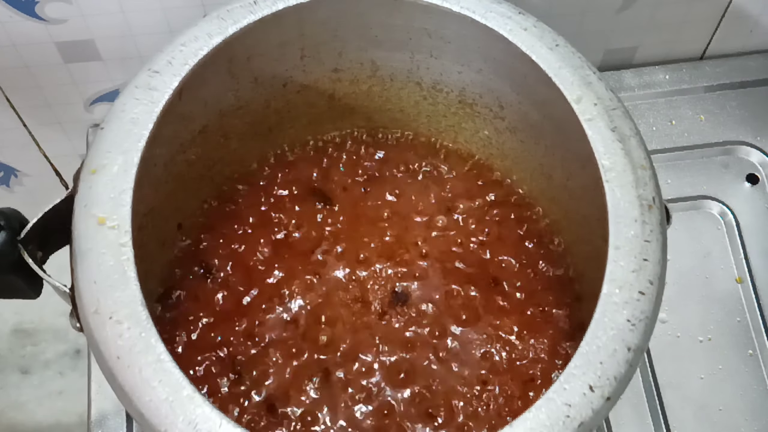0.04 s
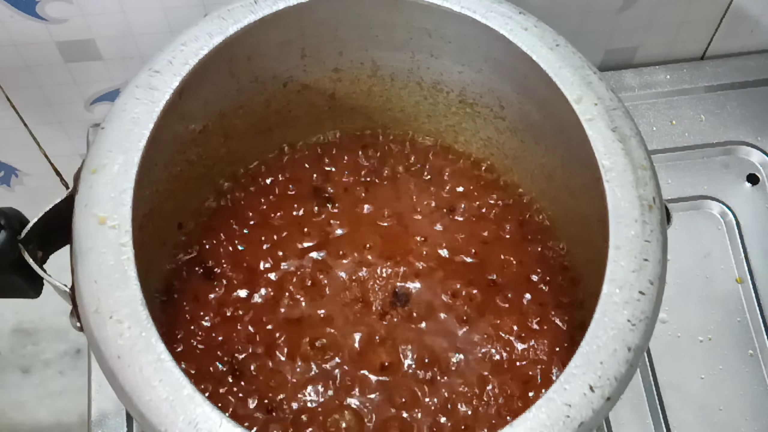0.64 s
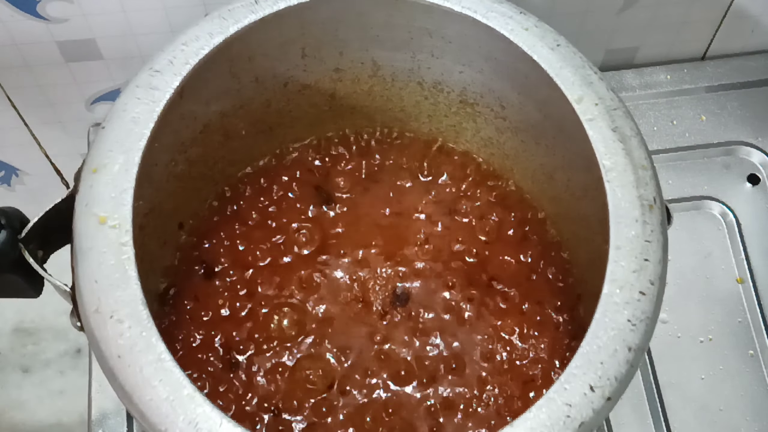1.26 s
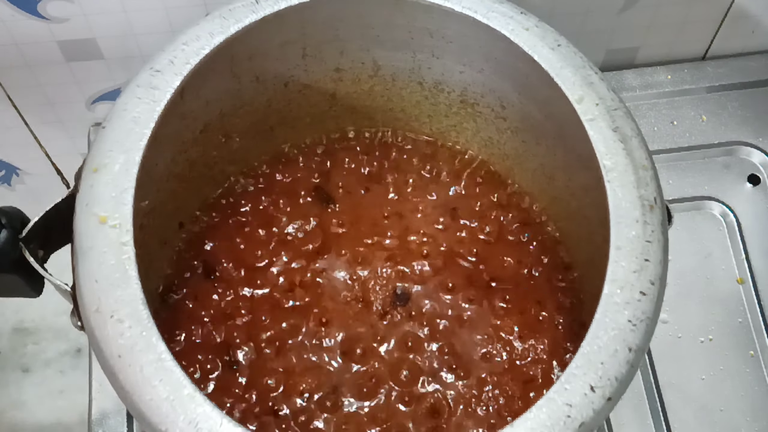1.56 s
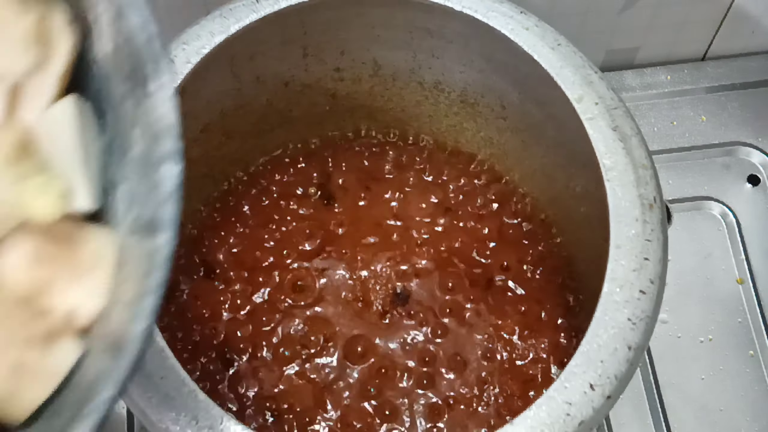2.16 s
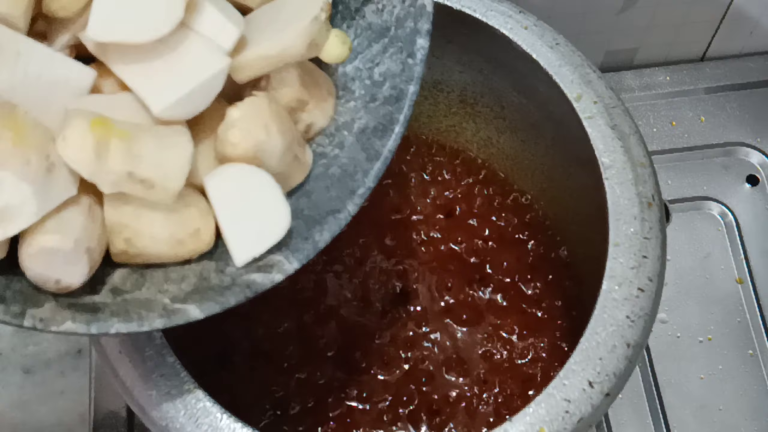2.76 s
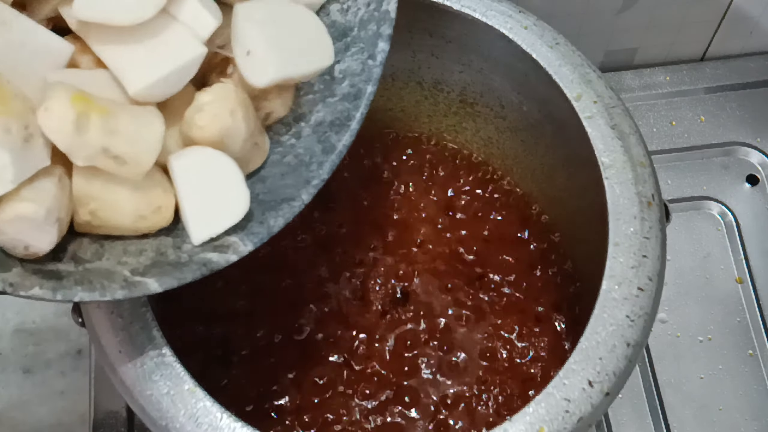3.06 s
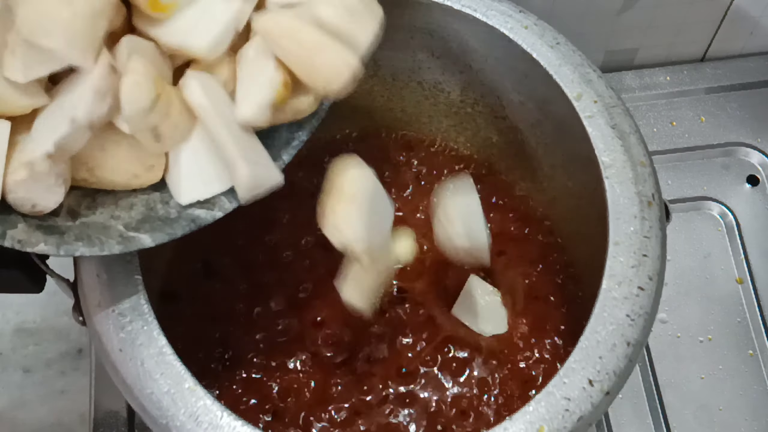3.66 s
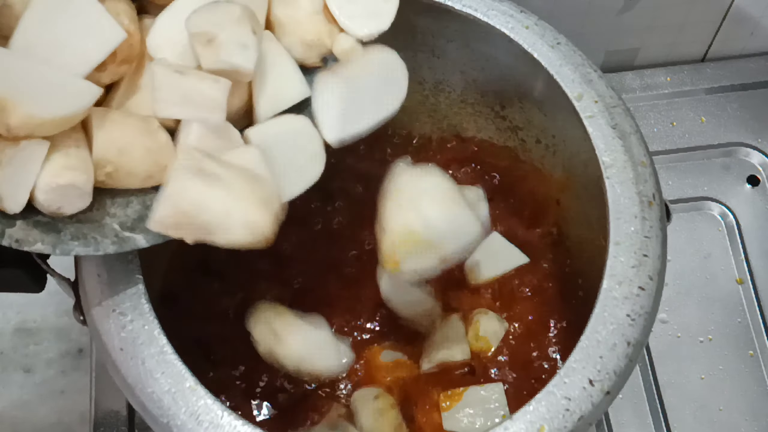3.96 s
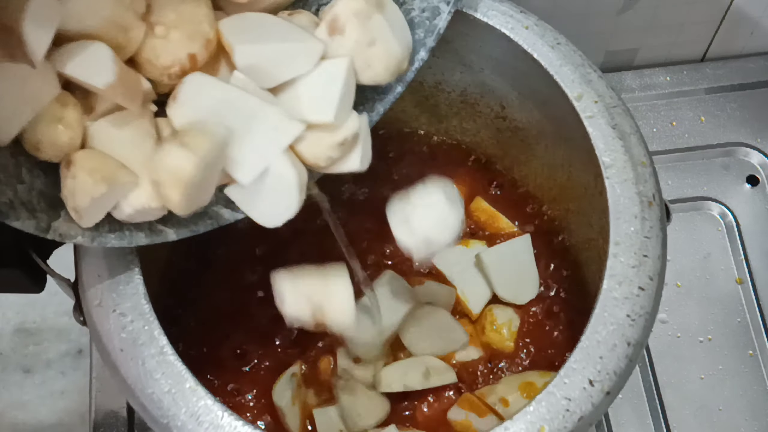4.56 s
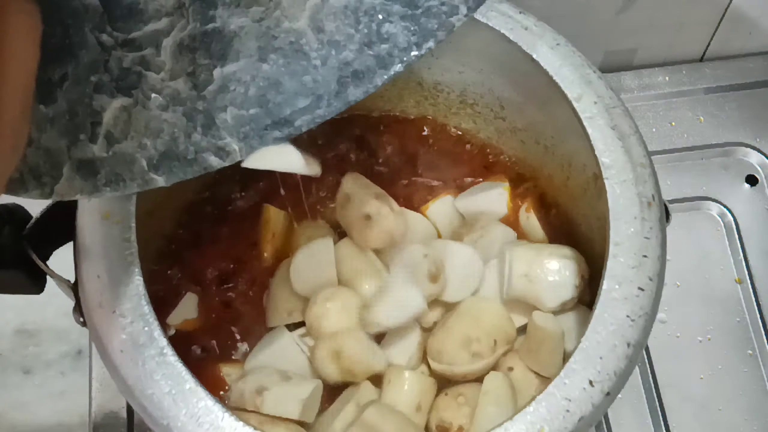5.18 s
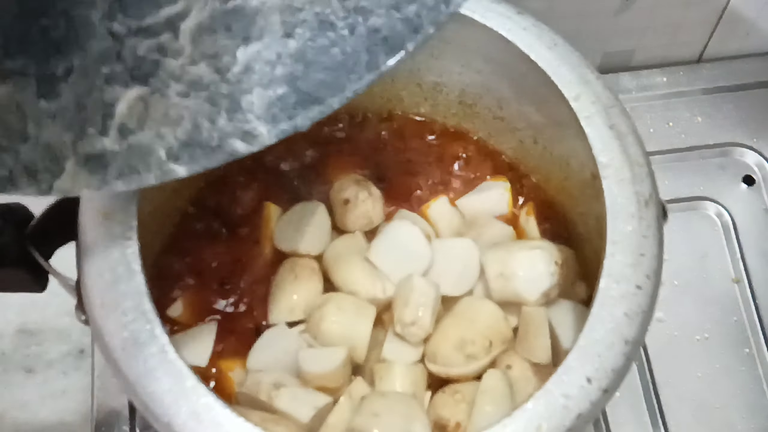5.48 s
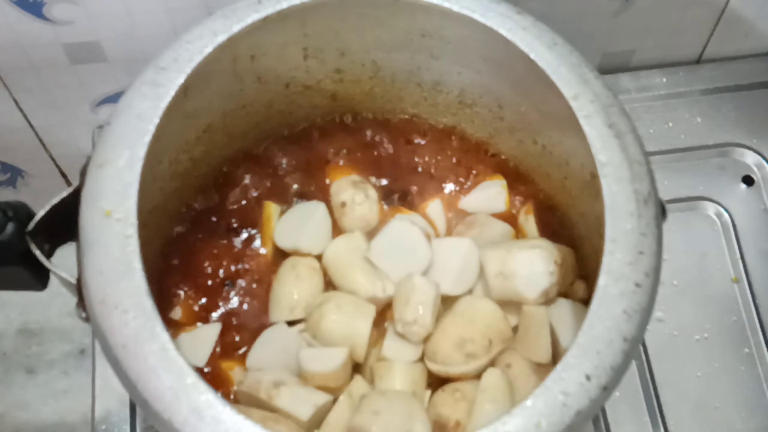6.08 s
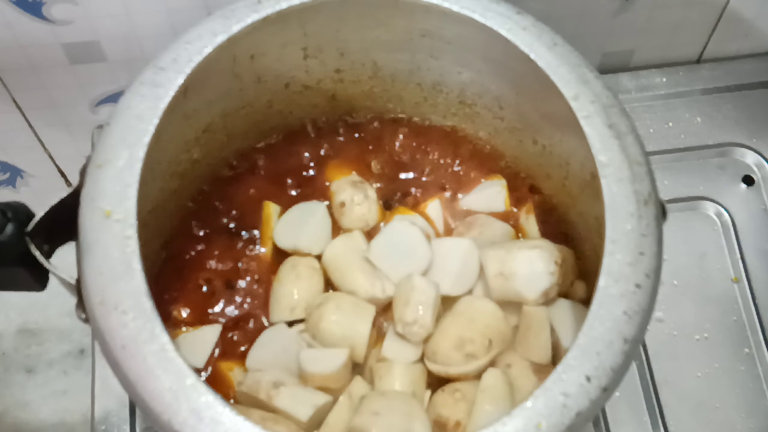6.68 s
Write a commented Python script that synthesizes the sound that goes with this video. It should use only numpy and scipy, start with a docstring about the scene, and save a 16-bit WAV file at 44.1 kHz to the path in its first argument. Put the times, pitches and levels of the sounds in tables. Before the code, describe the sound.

Thick sauce simmers quietly in an open metal cooker, with fine crackling and small bubble pops. About halfway through, vegetable chunks plop in one by one with a couple of sharp hissing splashes, then tumble in as a thudding, squelching heap. The sizzle grows, with tiny squeaks of steam. At the end a plate lands on a steel counter with a ringing double knock. It is heard close up in a small kitchen.

```python
"""Thick masala simmers in an open aluminium cooker in a small tiled kitchen: tiny bubbles crackle and fat
ones make the air in the pot ring. A plate of vegetable chunks is picked up and swung over the pot.
From 3.7 s the chunks plop into the sauce, singly and then in a heap; sauce splashes on the hot metal,
steam squeaks and sputters out, and the sizzle grows. At 6.5 s the plate is set down on the steel
counter with a ringing double knock."""
import sys
import numpy as np
from scipy import signal
from scipy.fft import rfft, irfft, next_fast_len
from scipy.io import wavfile
from scipy.ndimage import uniform_filter1d, map_coordinates

SR = 44100
rng = np.random.default_rng(int(sys.argv[2]) if len(sys.argv) > 2 else 0)


def unload_wav(signal):
    """Save mono or channel-first audio to the path in sys.argv[1] as 16-bit WAV at rate SR, clipped to [-1, 1]."""
    wavfile.write(
        sys.argv[1],
        SR,
        np.round(np.clip(np.atleast_2d(signal).T, -1, 1) * 32767).astype(np.int16),
    )


N = 301229
TIME = np.arange(N) / SR  # seconds into the scene
AGE = np.arange(SR // 2) / SR  # seconds into one short event
LEFT_DELAY_SAMPLES = 36  # sound reaches the left microphone later


def amp(db):
    """Turn decibels into a gain."""
    return 10 ** (np.asarray(db) / 20)

def unit(x):
    """Scale to an average (rms) size of 1."""
    return x / np.sqrt(np.mean(x ** 2) + 1e-20)

def peaked(x):
    """Scale to a peak of 1."""
    return x / np.abs(x).max()

def along(points, hz):
    """Read between (f/Hz, value) points on a log frequency axis."""
    f, v = np.transpose(points)
    return np.interp(np.log(hz + 1), np.log(f + 1), v)

def wobble(rate):
    """A smooth curve through `rate` random values a second."""
    return map_coordinates(rng.standard_normal(400), [TIME * rate], order=3, mode="wrap")

def unsteady():
    """A quick random waver, as long as one event."""
    return unit(uniform_filter1d(uniform_filter1d(rng.standard_normal(len(AGE)), size=200), size=200))

def dying(t60):
    """A fade that falls 60 dB in t60 seconds."""
    return np.exp(-np.log(1000) * AGE / max(t60, 1e-3))

def swell(s, attack_s, hold_s, release_s, t=TIME):
    """A gain that rises from s seconds, holds at 1, then falls 60 dB in release_s."""
    rise = np.clip((t - s) / max(attack_s, 1e-3), 0, 1)
    fading_s = np.maximum(t - s - attack_s - hold_s, 0)
    return rise * np.exp(-np.log(1000) * fading_s / max(release_s, 1e-3))

def filtered(x, response):
    """Filter x; response(hz) gives the gain and phase at each frequency."""
    n = x.shape[-1]
    padded = 2 * next_fast_len(n // 2 + 4096)
    return irfft(rfft(x, padded) * response(np.fft.rfftfreq(padded, 1 / SR)), padded)[..., :n]

def coloured(x, points):
    """Shape the tone of x with (f/Hz, level/dB) points."""
    def response(hz):
        cepstrum = irfft(np.log(amp(along(points, hz))))
        # folded so that nothing sounds before its cause
        cepstrum[1:len(hz) - 1] *= 2
        cepstrum[len(hz):] = 0
        return np.exp(rfft(cepstrum))
    return filtered(x, response)

def resonant(x, notes):
    """Let x ring at some notes: (f/Hz, rough width/Hz, level/dB)."""
    def response(f):
        return sum(amp(db) * (1j * f * 1.62 * width / (hz * hz - f * f + 1j * f * 1.38 * width)) ** 2
                   for hz, width, db in notes)
    return filtered(x, response)

def space(x, echo_db, t60):
    """Direct sound at two microphones plus echoes from pot wall and tiles."""
    paths = rng.standard_normal((2, len(AGE))) * dying(t60) * (1 - np.exp(-AGE / 0.0032))
    paths *= amp(echo_db) / np.linalg.norm(paths[0])
    paths[0, LEFT_DELAY_SAMPLES] += 1
    paths[1, 0] += 1
    return signal.fftconvolve(x[None], paths, axes=1)[:, :len(x)]

def scattered(source, echo_db, t60, count=2):
    """A source heard from several spots in the pot, each with its own echoes."""
    return unit(sum(space(source(), echo_db, t60) for _ in range(count)))

def add(track, s, sound):
    """Mix a stereo sound in at s seconds."""
    part = track[:, round(s * SR):][:, :sound.shape[1]]
    part += sound[:, :part.shape[1]]

def burst(t60):
    """A puff of noise that dies away."""
    return rng.standard_normal(len(AGE)) * dying(t60)

def pops(rate, spread_db):
    """Random clicks, `rate` a second, scattered in size by spread_db."""
    size = amp(spread_db * np.clip(rng.standard_normal(N), -2.5, 2.5))
    return (rng.random(N) < rate / SR) * size * rng.choice([-1, 1], N)

def whistle(hz, waver, glide_per_s, attack_s, hold_s, release_s):
    """A short tone that swells and fades; its pitch glides and wavers by a share of itself."""
    pitch = hz * (1 + waver * unsteady() + glide_per_s * (AGE - attack_s))
    return swell(0, attack_s, hold_s, release_s, AGE) * np.sin(2 * np.pi * np.cumsum(pitch) / SR)


# tone of the background: f/Hz, level/dB
ROOM_COLOUR = [(25, -4), (60, -3), (100, 6), (140, -14), (190, 2), (260, -8), (600, -2.5), (1500, -20),
               (8000, -8), (10500, -3.5), (13500, -15.5), (15200, -4.5)]

def room_tone():
    """The faint rumble of the burner and the kitchen."""
    noise = space(rng.standard_normal(N), echo_db=3.5, t60=0.17)
    return amp(-56.5) * unit(coloured(noise, ROOM_COLOUR))

# deep notes of the air in the pot: f/Hz, width/Hz, level/dB
DEEP_AIR = [(355.4, 6.2, 4), (396, 53, -1), (640, 170, -23)]
# runs of gurgling: t/s, level/dB
GURGLES = [(0.55, -56), (0.75, -60), (2.44, -58), (2.69, -54)]

def gurgles():
    """Slow bubbles sound the whole depth of the pot, faintly all the time and now and then in a run."""
    runs = sum(amp(db) * swell(s, attack_s=0.028, hold_s=0.014, release_s=0.16) for s, db in GURGLES)
    bubbles = space(pops(rate=110, spread_db=0), echo_db=-22.5, t60=0.45)
    return (amp(-67) + runs) * unit(resonant(bubbles, DEEP_AIR))

# notes of the air across the pot, then its higher ones: f/Hz, width/Hz, level/dB
POT_AIR = [(1214, 38.5, -5), (1293, 92, -11.5), (1546, 240, -14.5)]
HIGH_AIR = [(1910, 69, 2), (3630, 52, -12)]

def fat_bubbles():
    """Fat bubbles burst in fits and ring the air in the pot; the heap muffles all but the lowest note."""
    bursts = scattered(lambda: pops(rate=140, spread_db=1), echo_db=2.5, t60=0.059)
    full, stirred = fullness(), amp(-65) * stirring()
    fits = lambda db: amp(db) * unit(amp(0.5 * wobble(20)))
    bare = (fits(-63) + stirred) * unit(resonant(bursts, POT_AIR))
    high = (fits(-61.5) + amp(11) * stirred) * unit(resonant(bursts, HIGH_AIR))
    filled = (fits(-63) + stirred) * unit(resonant(bursts, POT_AIR[:1]))
    return (1 - full) * (bare + high) + full * filled

# big bubbles: t/s, level/dB, f/Hz
BIG_BUBBLES = [(0.04, -62, 1240), (0.27, -57, 1200), (0.35, -55, 1895), (0.401, -57, 1223),
               (0.609, -51.5, 1206), (0.73, -51, 1937), (0.899, -47, 1924), (1.16, -51, 1904),
               (1.19, -56.5, 1233), (1.229, -48, 1896), (1.421, -54, 1195), (1.49, -55, 1215),
               (1.7, -48, 1916), (1.96, -59, 1927), (2.049, -56, 1215), (2.269, -58, 1230),
               (2.361, -55, 1920), (2.51, -56, 1179), (2.711, -52, 1201), (2.839, -52.5, 1186),
               (3.029, -56, 1202), (3.192, -54.5, 1204), (3.239, -49, 1905), (3.56, -48, 1894),
               (3.66, -49, 1933), (3.67, -52.5, 1183), (4.381, -49.5, 1204), (4.461, -52.5, 1194),
               (4.66, -49, 1215), (4.829, -48, 1160), (4.899, -42, 1187), (5.43, -47.5, 1193),
               (5.921, -51, 1192), (6.259, -46.5, 1180), (6.37, -49, 1194), (6.43, -48, 1175)]

def big_bubbles():
    """A big bubble wells up and rings one note of the pot's air, each at a slightly different pitch."""
    out = np.zeros((2, N))
    for s, db, hz in BIG_BUBBLES:
        glide = 0.5 * rng.uniform(-1, 1)
        tone = whistle(hz, waver=0.017, glide_per_s=glide, attack_s=0.023, hold_s=0.01, release_s=0.19)
        add(out, s, amp(db) * space(tone, echo_db=-8, t60=0.1))
    return out

# single bubbles that spit: t/s, relative level/dB, f/Hz
SPITS = [(0.454, -44, 6440), (0.635, -43.5, 6100), (1.3272, -50, 1575), (1.4388, -40.5, 3850),
         (1.5686, -43.5, 3860), (1.925, -42, 6030), (3.364, -44.5, 4750)]

def spits():
    """A larger bubble bursts with a short pitched spit."""
    out = np.zeros((2, N))
    for s, db, hz in SPITS:
        spit = resonant(burst(t60=0.02), [(hz, hz / 9, 0), (hz * 1.16, hz / 1.9, -13)])
        add(out, s, amp(db + 5.5) * space(peaked(spit), echo_db=4.5, t60=0.24))
    return out

def pings(rate, hz, spread, cycles, size_db):
    """Small bubbles each ring briefly at their own pitch; a few are much louder than the rest."""
    start, pitch, size = rng.random((int(rate * N / SR), 3)).T[:, :, None]
    f = np.minimum(hz * np.exp(spread * (2 * pitch - 1)), SR / 3)
    t = AGE[:1024]
    tones = amp(-size_db * np.log(size + 0.014)) * np.sin(2 * np.pi * f * t) * np.exp(-f * t / cycles)
    where = (start * N).astype(int) + np.arange(len(t))
    return np.bincount(where.ravel(), tones.ravel(), N)[:N]

# tone of the crackle in the bare sauce, then around the heap: f/Hz, level/dB
BARE_COLOUR = [(200, -27), (650, -15), (1000, -28), (1250, -1), (2000, -0.5), (2850, -3), (3500, -1.5),
               (4800, -1.5), (6500, 3), (8200, -4.5), (9700, -3), (12500, -24), (13900, -30), (15200, -13)]
FULL_COLOUR = [(200, -10.5), (600, -10.5), (980, -16.5), (1200, -5), (1550, -1.5), (2200, 3), (4200, 0.5),
               (6500, 2), (8200, -5), (9700, -5), (12500, -20), (13900, -40), (15200, -13.5)]
# how hard the bare sauce simmers: t/s, relative level/dB
SIMMER = [(0.04, -53), (0.32, -52.5), (0.51, -50.5), (0.85, -52.5), (1.28, -52), (2.07, -52), (2.78, -53.5),
          (3.6, -51.5)]

def sizzle():
    """Bubble skins snap and ping in clumps; the chunks make the sizzle louder and darker."""
    clumps = amp(1.7 * wobble(32))
    snaps = lambda: clumps * unit(pops(rate=330, spread_db=6.5))
    bubbles = unit(space(pings(rate=500, hz=5600, spread=0.6, cycles=6, size_db=3), echo_db=3, t60=0.08))
    near = unit(space(pops(rate=34, spread_db=3.5), echo_db=-6, t60=0.03))  # right under the microphones
    crackle = scattered(snaps, echo_db=6, t60=0.1, count=6) + amp(-9) * bubbles + amp(-11) * near
    full = fullness()
    bare_gain = amp(1.5 + np.interp(TIME, *np.transpose(SIMMER))) + amp(-57.5) * stirring()
    fade_db_per_s, shield_db = -1, -7.5  # the plate shields the sizzle while it hangs over the pot
    full_gain = amp(-44 + fade_db_per_s * (TIME - FILL_START_S - FILL_S) + shield_db * hovering())
    bare = bare_gain * np.sqrt(1 - full) * unit(coloured(crackle, BARE_COLOUR))
    return bare + full_gain * np.sqrt(full) * unit(coloured(crackle, FULL_COLOUR))

HOVER_START_S = 4.65

def hovering():
    """How closely the plate hangs over the pot, 0 to 1."""
    return swell(HOVER_START_S, attack_s=0.32, hold_s=0.25, release_s=1.6)

# notes of the air between pot and plate, before their pitch is bent: f/Hz, width/Hz, level/dB
GAP_AIR = [(1800, 44, 5), (2270, 31, 6), (2575, 32, 3), (3060, 51, 4), (3540, 160, -10), (4300, 64, 0),
           (5830, 80, -23)]

def hollow_sizzle():
    """Fits of crackle ring in the air under the tilted plate; the pitch sinks as the plate lifts away."""
    crackle = scattered(lambda: pops(rate=90, spread_db=5), echo_db=0, t60=0.05)
    hollow = resonant(crackle, GAP_AIR)
    fits = amp(3.5 * wobble(16))
    speed = 1.044 - 0.07 * np.maximum(TIME - HOVER_START_S, 0)  # slower sounds lower
    sinking = np.array([map_coordinates(side, [np.cumsum(speed)], order=3, mode="mirror")
                        for side in hollow])
    return amp(-51) * hovering() * unit(fits * sinking)

# the plate is swung over the pot, then tilted: t/s, rise/s, level/dB
SWINGS = [(2.19, 0.11, -45), (2.91, 0.032, -57.5)]
# low notes of that movement: f/Hz, width/Hz, level/dB
RUMBLE_NOTES = [(70, 29, -14), (99.6, 4.3, 1.5), (181, 11, -17.5)]

def handling():
    """A soft low rumble each time the plate is moved over the rim."""
    level = sum(amp(db) * swell(s, rise_s, hold_s=0.053, release_s=0.41) for s, rise_s, db in SWINGS)
    jolts = space(pops(rate=210, spread_db=-3), echo_db=-21, t60=0.42)
    return level * unit(resonant(jolts, RUMBLE_NOTES))

# notes of the loaded cooker: f/Hz, level/dB, time to fade by 60 dB/s
COOKER_NOTES = [(124, -9.5, 0.13), (195, -1.5, 0.24), (242.5, -2.5, 0.13), (282, -0.5, 0.21),
                (356.6, -1, 0.25), (390, -1, 0.095), (400, 8, 0.022), (531, 5, 0.032)]

def cooker_ring(scatter_db, rise_s):
    """The struck cooker rings; each microphone meets each note at its own strength and phase."""
    ring = 0
    for hz, db, t60 in COOKER_NOTES:
        strength = amp(db + scatter_db * rng.standard_normal((2, 1)))
        ring += strength * dying(t60) * np.sin(2 * np.pi * (hz * AGE + rng.random((2, 1))))
    return ring * (1 - np.exp(-AGE / rise_s))

# the plate is picked up and chunks shift on it: t/s, level/dB, f/Hz, share passed to the cooker/dB
BUMPS = [(1.145, -32, 765, -45), (1.221, -46, 760, -50), (3.294, -38, 630, -2.5), (3.346, -42, 313, -11),
         (3.494, -41, 540, -4.5), (3.528, -39.5, 397, -4), (3.567, -37.5, 586, -9),
         (3.592, -36.5, 527, -2.5), (3.646, -47, 300, -6), (4.808, -32, 640, -39), (4.836, -32, 620, -21),
         (5.118, -30.5, 810, -31)]

def bumps():
    """A soft, hollow blow on the loaded plate also rings the cooker when the plate rests on it."""
    out = np.zeros((2, N))
    for s, db, hz, cooker_db in BUMPS:
        colour = [(hz / 6, -46), (hz / 2, -22), (hz / 1.29, 0),
                  (hz * 1.17, -2), (hz * 1.72, -22), (hz * 6, -50)]
        blow = peaked(coloured(burst(t60=0.046), colour))
        ring = amp(cooker_db) * cooker_ring(scatter_db=2, rise_s=0.004)
        add(out, s, amp(db) * (space(blow, echo_db=2, t60=0.21) + ring))
    return out

STEAM_WAVER, STEAM_GLIDE_PER_S = 0.018, -0.15  # shares of the pitch

def sputter():
    """Steam escapes all over the fresh heap in tiny pitched spurts that slowly weaken."""
    out = np.zeros((2, N))
    start_s, length_s, spurts_per_s = 5.15, 1.3, 45
    low_hz, high_hz = 2070, 6060
    for after_s, pitch in rng.random((int(spurts_per_s * length_s), 2)) * [length_s, 1]:
        hz = low_hz * (high_hz / low_hz) ** pitch
        tone = whistle(hz, STEAM_WAVER, STEAM_GLIDE_PER_S, attack_s=0.004, hold_s=0.01, release_s=0.13)
        tone *= amp(-53 - 3 * after_s)
        add(out, start_s + after_s, np.array([np.roll(tone, LEFT_DELAY_SAMPLES), tone]))
    return out

# wet squeaks from the settling heap: t/s, level/dB, f/Hz, hold/s
SQUEAKS = [(4.715, -51, 5840, 0.03), (4.931, -48, 3655, 0.011), (4.997, -45.5, 5210, 0.05),
           (5.011, -43, 5690, 0.043), (5.151, -51, 1818, 0.14), (5.28, -52, 3560, 0.051),
           (5.32, -48, 5730, 0.06), (5.467, -49, 5600, 0.039), (5.48, -51.5, 2210, 0.13)]

def squeaks():
    """Steam and sauce squeeze through gaps between the chunks in thin, slightly falling squeaks."""
    out = np.zeros((2, N))
    for s, db, hz, hold_s in SQUEAKS:
        tone = whistle(hz, STEAM_WAVER, STEAM_GLIDE_PER_S, attack_s=0.014, hold_s=hold_s, release_s=0.065)
        add(out, s, amp(db) * space(tone, echo_db=0, t60=0.08))
    return out

# tone of the slopping sauce: f/Hz, level/dB
SLOSH_COLOUR = [(70, -52), (180, -7), (380, -6), (560, 2), (800, -23), (1500, -50)]

def slosh():
    """Between landings the churned sauce keeps slopping dully around the chunks."""
    lumps = scattered(lambda: pops(rate=160, spread_db=2), echo_db=-3, t60=0.12)
    return amp(-41) * stirring() ** 2 * unit(coloured(lumps, SLOSH_COLOUR))

# sauce on hot metal: t/s, snap level/dB, hiss level/dB, f/Hz, time for the hiss to fade by 60 dB/s
SPLASHES = [(3.8104, -19, -22, 5600, 0.23), (3.9898, -14, -26.5, 5400, 0.22), (4.089, -30, -30, 6500, 0.16),
            (3.912, -46, -34.5, 6000, 0.45), (4.398, -50, -38, 5430, 0.3), (4.994, -36, -32.5, 5800, 0.15)]

def splashes():
    """Sauce hits the hot wall with a wet snap; its droplets hiss away and ring the air in the pot."""
    def spray(hz, t60):
        colour = [(hz / 7, -24), (hz / 2.1, -13), (hz / 1.3, -1),
                  (hz, 0), (hz * 1.6, -7), (hz * 2.6, -17)]
        drops = burst(t60) * amp(4 * rng.standard_normal(len(AGE))) * np.minimum(AGE / 0.003, 1)
        return peaked(coloured(drops, colour) + amp(8.5) * resonant(drops, POT_AIR))
    out = np.zeros((2, N))
    for s, snap_db, hiss_db, hz, t60 in SPLASHES:
        snap = amp(snap_db) * spray(hz, t60=0.024)
        hiss = amp(hiss_db) * spray(hz, t60)
        add(out, s, space(snap + hiss, echo_db=-11, t60=0.1))
    return out

FILL_START_S, FILL_S = 4.76, 0.7

def fullness():
    """Share of the sauce that the chunks cover, 0 to 1."""
    return np.clip((TIME - FILL_START_S) / FILL_S, 0, 1)

# the heap slides in, in surges: t/s, hold/s, thud level/dB, squelch level/dB
SURGES = [(4.793, 0.13, -41, -63), (4.981, 0.036, -33.5, -40), (5.096, 0.012, -40.5, -44.5)]
# tone of the thuds, then of the squelch: f/Hz, level/dB
THUD_COLOUR = [(40, -62), (90, -19.5), (190, 3), (280, 0.5), (410, 0.5), (580, -12.5), (790, -4),
               (930, -31), (1100, -20), (1500, -41), (2400, -60)]
SQUELCH_COLOUR = [(560, -65), (950, -47), (1150, 5.5), (1320, -55), (1450, 0), (1650, -35), (1800, -7),
                  (2260, -6), (2860, -9.5), (4250, -10), (4750, -12), (5500, -20), (9000, -23),
                  (11700, -42), (19800, -120)]
# notes of the hollows in the heap: f/Hz, width/Hz, level/dB
HEAP_AIR = [(809, 22, -0.5), (1169, 50, -9.5)]

def heap():
    """The rest of the chunks tumble in, thudding and squelching, and ring the hollows between them."""
    thud, squelch = sum(
        amp([[thud_db], [squelch_db]]) * swell(s, attack_s=0.047, hold_s=hold_s, release_s=0.42)
        for s, hold_s, thud_db, squelch_db in SURGES)
    lumps = scattered(lambda: pops(rate=110, spread_db=2), echo_db=0, t60=0.16)
    wet = scattered(lambda: pops(rate=100, spread_db=0.5), echo_db=9, t60=0.21)
    hollows = amp(-8.5) * unit(resonant(lumps, HEAP_AIR))
    thudding = thud * (unit(coloured(lumps, THUD_COLOUR)) + hollows)
    return thudding + squelch * unit(coloured(wet, SQUELCH_COLOUR))

# chunks landing: t/s, relative level/dB, f/Hz, slap compared with the push/dB
PLOPS = [(3.703, -33, 380, -8.5), (3.7957, -22.5, 413, -9), (3.881, -25.5, 395, -14.5),
         (3.955, -24.5, 384, -7), (4.027, -27, 410, -4.5), (4.039, -25.5, 355, -19),
         (4.0585, -23.5, 378, -18.5), (4.077, -30.5, 373, -9), (4.091, -29.5, 377, -12),
         (4.1326, -20, 394, -16), (4.192, -31.5, 383, -10.5), (4.2203, -28.5, 395, -7),
         (4.236, -32.5, 380, -16), (4.265, -39, 330, -17), (4.323, -37.5, 362, -32),
         (4.382, -34, 356, -11.5), (4.402, -40.5, 306, -6), (4.507, -23.5, 394, -17),
         (4.631, -33.5, 196, -6.5), (4.668, -35, 373, -13), (4.722, -36, 366, -16), (4.877, -32, 394, -32),
         (4.99, -32.5, 420, -29), (5.019, -38, 315, -13), (5.039, -44, 270, -11), (5.064, -29, 400, -14),
         (5.116, -32, 505, -30)]
# tone of the wet slap: f/Hz, level/dB
SLAP_COLOUR = [(150, -27), (600, 12), (1000, -24.5), (1210, 8.5), (1400, -15), (1900, -15), (2600, -5.5),
               (6000, -19), (12000, -46)]

def plops():
    """A chunk pushes into the sauce, slaps and rings the cooker; a softer echo follows off the wall."""
    def push(cycle, peak_cycles=1.9, width_cycles=1.64):
        return np.exp(-((cycle - peak_cycles) / width_cycles) ** 2) * np.sin(2 * np.pi * cycle)
    out = np.zeros((2, N))
    for s, db, hz, slap_db in PLOPS:
        echo_s = 0.027 * rng.uniform(0.89, 1.0)
        thump = push(AGE * hz) + amp(-9.5) * push((AGE - echo_s) * hz)
        ring = amp(-14) * cooker_ring(scatter_db=3, rise_s=0.005)[0]
        puff = burst(t60=0.11) * np.minimum(AGE / 0.015, 1)
        slap = amp(slap_db) * peaked(coloured(puff, SLAP_COLOUR))
        add(out, s, amp(db + 4) * space(thump + slap + ring, echo_db=-10, t60=0.2))
    return out

def stirring():
    """How much the landing chunks have churned the sauce, 0 to 1; harder landings churn more."""
    churns = (amp(db) * swell(s, attack_s=0.0036, hold_s=0, release_s=0.52) for s, db, _, _ in PLOPS)
    return peaked(np.sqrt(sum(churn ** 2 for churn in churns)))

# the plate hits the counter: t/s, relative clack level/dB, f/Hz above which it is dulled,
# relative ring level/dB, where it hits (0 edge, 1 base)
KNOCKS = [(6.537, -11, 4500, -23, 0), (6.541, -13.5, 2500, -33, 0), (6.556, -19, 1000, -28, 0.1),
          (6.6535, -10.5, 4500, -24, 1), (6.662, -17, 4500, -35, 1), (6.676, -19, 3000, -31, 0.9),
          (6.704, -24, 6000, -40, 1), (6.711, -16.5, 3500, -33, 0.9), (6.744, -19, 900, -32, 0.8),
          (6.776, -24, 900, -38, 0.8)]
# tone of the clack: f/Hz, level on the edge/dB, level on the base/dB
CLACK_COLOUR = [(99, -42, -31), (249, -23, -20), (500, -11, -7.5), (750, 1, -0.5), (1090, -11, -9),
                (1370, -10.5, -10), (1680, -19, -8.5), (2060, -15, -7), (2450, -32, -36.5),
                (3150, -17, -15), (3300, -40, -12.5), (3580, -20, -16), (4100, -10, -14), (4560, -18, -11),
                (5700, -18.5, -22.5), (6100, -37, -26), (6940, -22, -26), (9000, -33, -33),
                (15000, -41, -48)]
# notes of the plate: f/Hz, level on the edge/dB, level on the base/dB, time to fade by 60 dB/s
PLATE_NOTES = [(352, -16, -12, 0.42), (528, -16, -14, 0.38), (616, -13, -23, 0.46), (654, -11, -12.5, 0.36),
               (707, -15, -11.5, 0.42), (755, -6.5, -6.5, 0.7), (796, -18, -15, 0.57),
               (846, -13, -9.5, 0.77), (880, -10, -16, 0.8), (963, -20, -11, 0.6), (1046, -6, -9, 0.42),
               (1079, -5, 1, 0.26), (1131, -4, -17, 0.57), (1263, -22, -17, 0.29), (1343, -17, -14.5, 0.27),
               (1633, -35, -11, 0.26), (1908, -28, -3, 0.2), (1921, -24, -2, 0.2), (1958, -15.5, -11, 0.45),
               (2010, -22, -14, 0.27), (3090, -22, -15.5, 0.28), (3130, -24, -9.5, 0.099),
               (3600, -11, -16, 0.097), (4160, -11.5, -22, 0.2), (4156, -13, -12, 0.2),
               (4560, -26, -9, 0.2), (4850, -28, -9, 0.22), (5080, -25, -11, 0.13), (5540, -11, -17, 0.15),
               (6680, -5.5, -28, 0.095), (6660, -7, -26, 0.11)]
# the knocks' loudness dips briefly before the second knock, swells, then falls back: t/s, level/dB
KNOCK_GAIN = [(6.632, 3.5), (6.65, -5.5), (6.654, 3.5), (6.785, 7.5), (6.83, 3.5)]

def knocks():
    """Each hard contact clacks and feeds the plate's ring; edge and base favour different notes."""
    out = np.zeros((2, N))
    for s, clack_db, cut_hz, _, flat in KNOCKS:
        colour = [(hz, np.interp(flat, [0, 1], [edge, base])) for hz, edge, base in CLACK_COLOUR]
        clack = space(peaked(coloured(burst(t60=0.014), colour)), echo_db=-4, t60=0.4)
        add(out, s, amp(clack_db) * filtered(clack, lambda hz: 1 / (1 + 1j * hz / cut_hz)))
    first_s = KNOCKS[0][0]
    rocking_db, rocking_share = 2, 0.007  # rocking on the counter shakes each note's level and pitch
    for hz, edge_db, base_db, t60 in PLATE_NOTES:
        energy = 0
        for s, _, cut_hz, ring_db, flat in KNOCKS:
            strength = amp(ring_db + np.interp(flat, [0, 1], [edge_db, base_db]))
            energy += (strength * swell(s - first_s, 0, 0, t60, AGE)) ** 2 / (1 + (hz / cut_hz) ** 2)
        cycles = np.cumsum(hz * (1 + rocking_share * unsteady())) / SR + rng.random((2, 1))
        add(out, first_s, np.sqrt(energy) * amp(rocking_db * unsteady()) * np.sin(2 * np.pi * cycles))
    return out * amp(np.interp(TIME, *np.transpose(KNOCK_GAIN)))

def scene():
    """Everything in and around the pot."""
    simmer = sizzle() + fat_bubbles() + big_bubbles() + gurgles() + spits() + hollow_sizzle()
    pouring = handling() + bumps() + plops() + slosh() + splashes() + heap() + squeaks() + sputter()
    return simmer + pouring + knocks() + room_tone()

# how much louder the left microphone is than the right: f/Hz, level/dB
LEFT_LEAD = [(80, 1.5), (200, 2.5), (400, 4.5), (750, 8), (1250, 11), (2300, 6), (4400, 7), (8000, 1),
             (15000, 3.5)]

def record(dry):
    """The left microphone hears the middle range louder; peaks are rounded, deep bass and top are cut."""
    sides = np.array([[0.5], [-0.5]])
    low_cut_hz, top_hz, ceiling = 55, 15850, 0.85
    low_cut = lambda hz: (1j * hz / (low_cut_hz + 1j * hz)) ** 2
    heard = filtered(dry, lambda hz: amp(sides * along(LEFT_LEAD, hz)) * low_cut(hz))
    rounded = heard / (1 + (heard / ceiling) ** 4) ** 0.25
    return filtered(rounded, lambda hz: hz < top_hz)


dry = scene()
out = record(dry)
unload_wav(out)
```